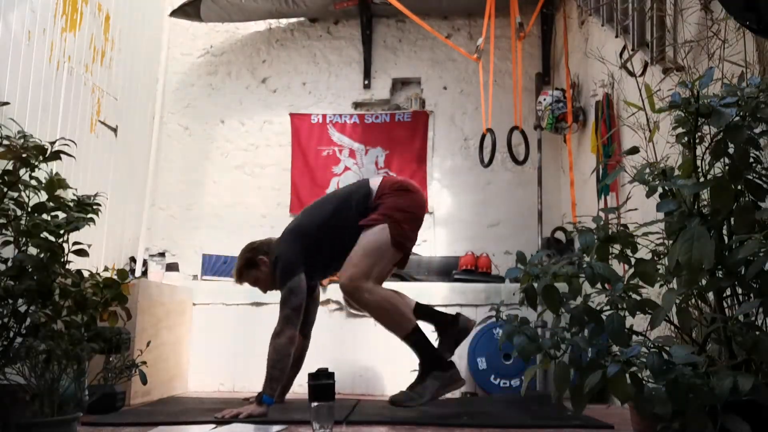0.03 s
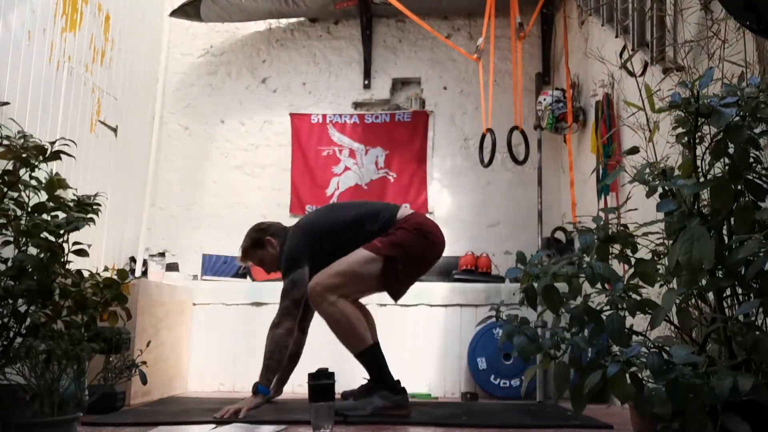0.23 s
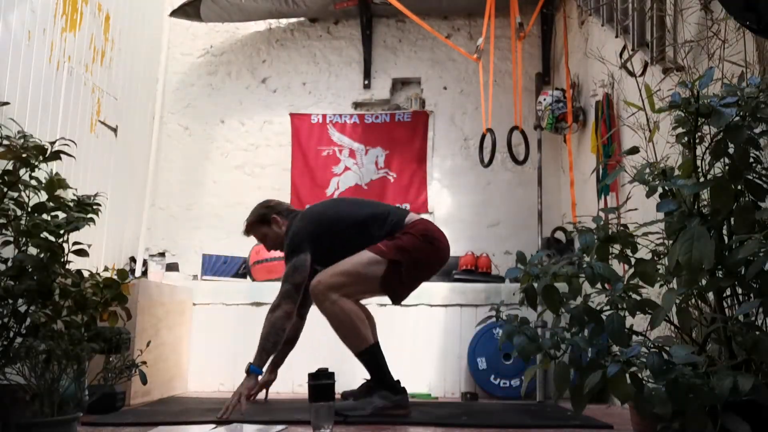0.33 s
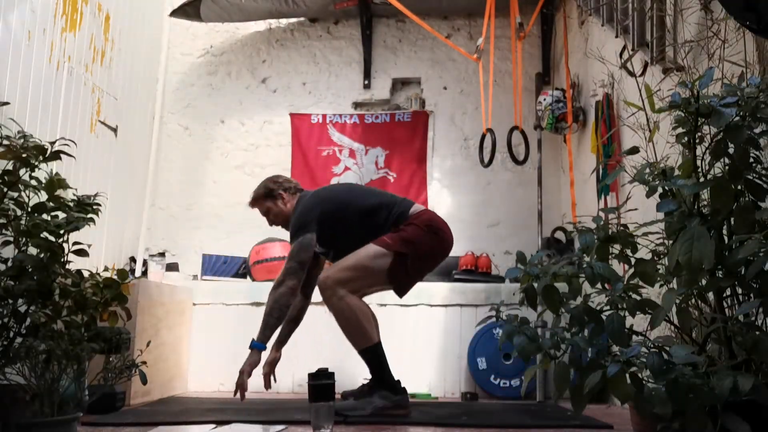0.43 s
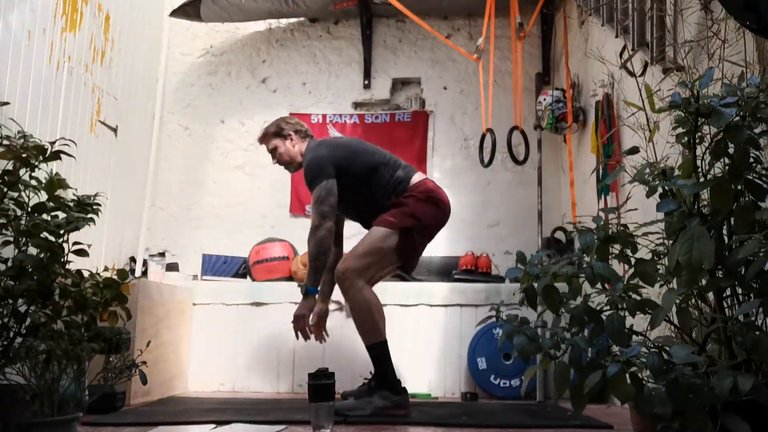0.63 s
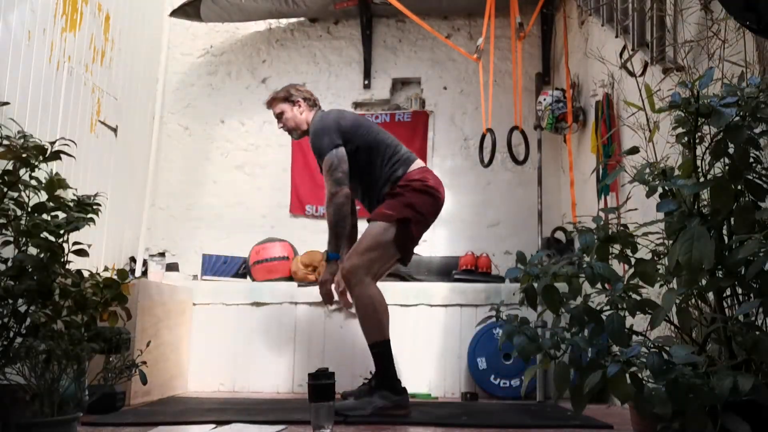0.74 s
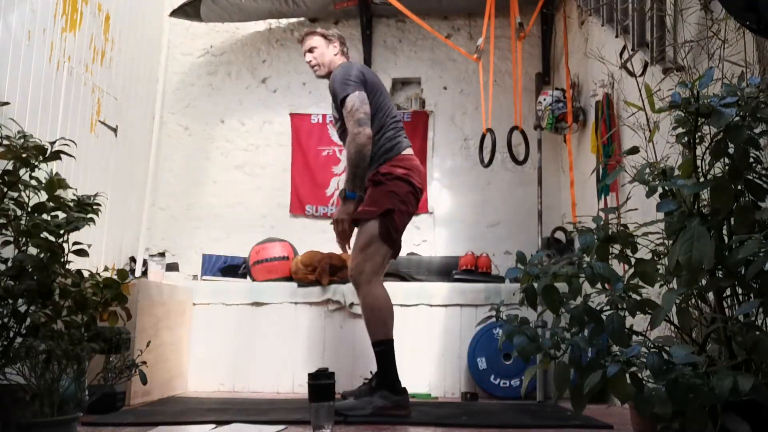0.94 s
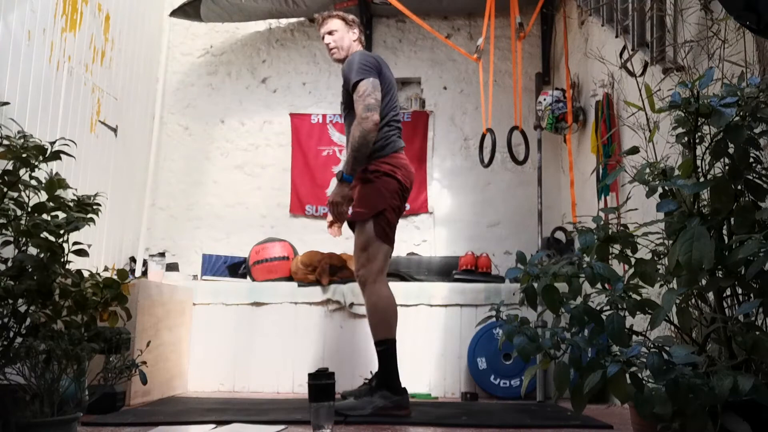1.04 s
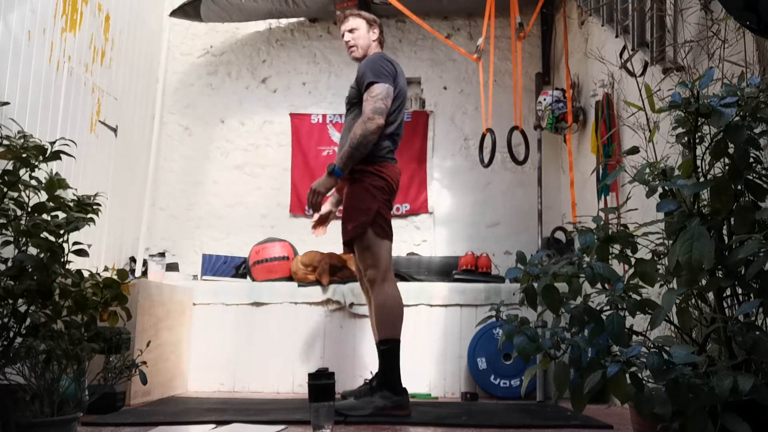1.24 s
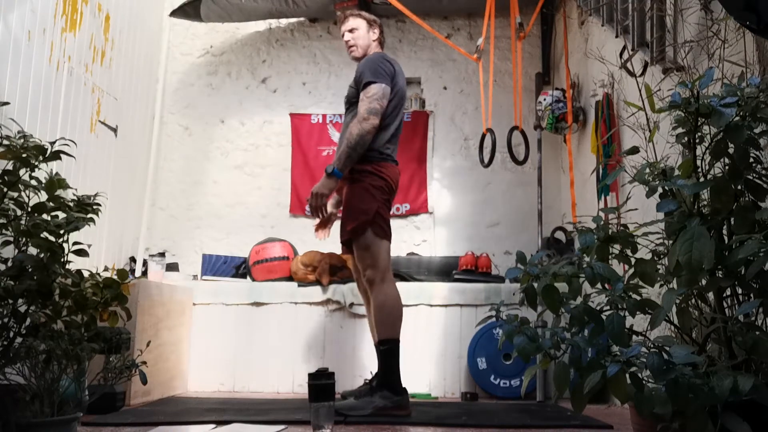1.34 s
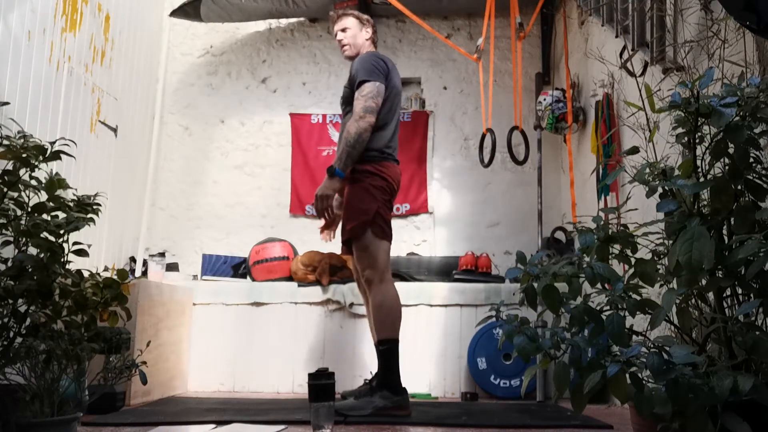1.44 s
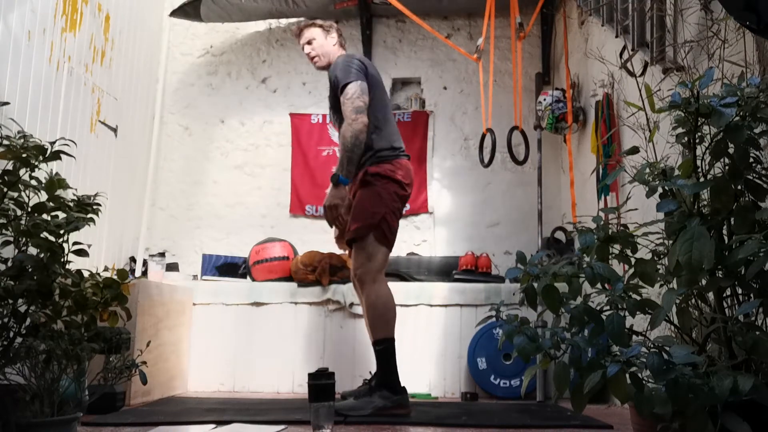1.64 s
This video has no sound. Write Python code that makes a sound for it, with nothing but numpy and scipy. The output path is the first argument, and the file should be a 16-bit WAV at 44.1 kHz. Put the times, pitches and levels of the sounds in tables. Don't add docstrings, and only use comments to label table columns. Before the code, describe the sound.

Shoes landing on a padded mat: a faint scuff and light patter in the first 0.1 s, then at about 0.22 s a rapid cluster of toe slaps and grainy rubber scuffing, heels dropping near 0.3 s with a deep hollow floor boom. Small taps end by 0.4 s, a barely audible brush follows near 0.5 s. The short hard-walled echo fades into quiet traffic rumble, thin hiss and a very faint steady hum.

```python
import sys
import numpy as np
from scipy import signal
from scipy.fft import rfft, irfft, next_fast_len
from scipy.io import wavfile
from scipy.ndimage import map_coordinates

SR = 44100
rng = np.random.default_rng(int(sys.argv[2]) if len(sys.argv) > 2 else 0)


def invert_db(x):
    u = np.asarray(x, float) / 20
    return 10 ** u


def dump(signal):
    limited = np.clip(np.atleast_2d(signal).T, -1, 1)
    pcm = np.round(limited * 32767).astype(np.int16)
    wavfile.write(sys.argv[1], SR, pcm)


N = 74970


def unit(x):
    return x / np.sqrt(np.mean(x ** 2) + 1e-20)


def along(points, hz):
    f, v = np.transpose(points)
    return np.interp(np.log(hz + 1), np.log(f + 1), v)


def wobble(knots_per_s):
    knots = rng.standard_normal(int(N * knots_per_s / SR) + 4)
    return map_coordinates(knots, [np.arange(N) * knots_per_s / SR])


def filtered(x, response):
    m = next_fast_len(N + SR // 2)
    return irfft(rfft(x, m) * response(np.fft.rfftfreq(m, 1 / SR)), m)[..., :N]


# (frequency [Hz], correlation [0-1])
NOISE_ALIKE = [(60, 1), (180, 0.95), (550, 0.34), (1650, 0.06), (4970, 0.18), (15000, 0.038)]


def rush(spectrum):
    def mid_side(hz):
        turn = np.arccos(np.clip(along(NOISE_ALIKE, hz), 0, 1)) / 2
        return invert_db(along(spectrum, hz)) * [np.cos(turn), np.sin(turn)]

    mid, side = filtered(rng.standard_normal((2, N)), mid_side)
    return unit(np.array([mid + side, mid - side]))


# (frequency [Hz], density [dB per Hz])
RUMBLE = [(22, -22), (45, -17), (62, -11), (80, -2), (98, -13.5), (280, -16), (600, -24.5), (1000, -32),
          (2400, -100)]
# (frequency [Hz], density [dB per Hz])
HISS = [(500, -40), (1100, -3), (2000, -6), (3000, -11), (5200, -15), (7600, -17), (10000, -14),
        (15600, -16)]
RUMBLE_DB, HISS_DB = -55, -72
HUM_HZ, HUM_DB = 740, -75


def background():
    t = np.arange(N) / SR
    hum = invert_db(HUM_DB + 1.5 * wobble(8)) * np.sin(2 * np.pi * HUM_HZ * t + 0.6 * wobble(6))
    rumble = invert_db(RUMBLE_DB + 0.4 * wobble(2.64) + 0.8 * wobble(11.74)) * rush(RUMBLE)
    hiss = invert_db(HISS_DB + 0.8 * wobble(2.5)) * rush(HISS)
    return rumble + hum + hiss


SCUFF_S = [
    -.02,
    .2235,
    .485,
]
# (hold [s], level [dB], fall over hold [dB], t60 after hold [s])
SCUFFS = [
    (0.12, -53, 4, .6),
    (0.155, -44, 12, .18),
    (.03, -70, 2, .25),
]
# (frequency [Hz], density [dB per Hz])
RUB = [(1700, -34), (2300, -27), (2800, -28), (3600, -34), (5400, -35), (8500, -30.5), (12000, -32),
       (15600, -41)]
SCUFF_RISE_S = 0.003


def scuffs():
    t = np.arange(N) / SR
    level = np.zeros(N)
    for start_s, (hold_s, db, fall_db, t60_s) in zip(SCUFF_S, SCUFFS):
        sag_db = fall_db * np.clip((t - start_s) / hold_s, 0, 1)
        decay_db = 60 * np.clip(t - start_s - hold_s, 0, 9) / t60_s
        rise = 1 - np.exp(-np.clip(t - start_s, 0, 9) / SCUFF_RISE_S)
        level += invert_db(db - sag_db - decay_db) * rise
    grain = invert_db(0.39 * wobble(52.8))
    return level * grain * rush(RUB)


# (slap level [dB], brightness [Hz], weight into floor [dB])
CONTACTS = [(-37.5, 750, -55.5), (-37, 1200, -55.5), (-40, 380, -52.5), (-44, 2000, -69),
            (-44.5, 1200, -62), (-46, 2100, -67.5), (-49, 1400, -69.5), (-20, 2200, -59.5),
            (-16.5, 3200, -48), (-23.5, 3600, -74), (-19, 2100, -34.5), (-21.5, 3100, -60),
            (-25.5, 4200, -36), (-24.5, 1800, -61), (-22, 2200, -32.5), (-23.5, 1300, -36),
            (-25.5, 5400, -32), (-28.5, 1700, -47), (-24, 2000, -33), (-23.5, 1530, -42),
            (-27.5, 1690, -18), (-35, 900, -33.5), (-38.5, 2000, -36), (-39.5, 2300, -50)]
# (frequency [Hz], width [Hz], level [dB])
MAT = [(267, 89, -4), (530, 86, 2), (625, 37, 0.5), (701.5, 87, 3.5), (894, 90, 3.5), (1087, 120, -5),
       (1392, 67, -11.5), (847, 1400, -11.5), (2222, 350, -9.5), (2540, 200, -12)]
SLAP_T60_S, GRIT = 0.014, 0.65
CRISP_HZ = 2900


def slaps():
    t = np.arange(4096) / SR
    f = np.fft.rfftfreq(len(t), 1 / SR)
    grit = GRIT * invert_db(-60 * t / SLAP_T60_S) * rng.standard_normal((len(CONTACTS), len(t)))
    push = 6 * (t == 0)
    modes = sum(invert_db(db) * 1j * f * w / (c * c - f * f + 1j * f * w) for c, w, db in MAT)
    foam = 1 / (1 + 1j * f / CRISP_HZ - (f / CRISP_HZ) ** 2) ** 2
    db, bright_hz, _ = np.transpose(CONTACTS)[..., None]
    softness = 1 / (1 + 1j * f / bright_hz) ** 2
    return 8 * invert_db(db) * irfft(rfft(grit + push) * modes * foam * softness, len(t))


CONTACT_S = [.001, .0205, .037, .043, .055, .068, .084, .223, .2259, .2312, .2339, .2372, .2408, .2485,
             .2538, .257, .268, .278, .2825, .2895, .2945, .325, .347, .3685]
# (frequency [Hz], level [dB], t60 [s])
BOARDS = [(46, 0, .55), (74, -1, .3), (113, -8, .45), (148, -16, .4), (194, -11, .22), (290, -5, .2)]
BOARD_RISE_S = 0.003284


def floor_boom():
    out = np.zeros(N + SR)
    t = np.arange(SR // 2) / SR
    ring = sum(invert_db(db - 60 * t / t60_s) * np.sin(2 * np.pi * hz * t) for hz, db, t60_s in BOARDS)
    ring = ring * (1 - np.exp(-t / BOARD_RISE_S))
    for start_s, (_, _, weight_db) in zip(CONTACT_S, CONTACTS):
        out[round(start_s * SR):][:len(t)] += invert_db(weight_db) * ring
    return out[:N]


# (frequency [Hz], t60 [s])
YARD = [(150, 0.4), (700, 0.33), (1300, .28), (2500, 0.26), (8000, 0.3)]
# (frequency [Hz], share [0-1])
YARD_ALIKE = [(300, .6), (600, .2), (2500, .2)]
YARD_GAP_S = 0.0045


def yard():
    hz, t, z = signal.stft(rng.standard_normal((3, SR // 2)), SR, nperseg=256)
    share = np.clip(along(YARD_ALIKE, hz), 0, 1)[:, None]
    pair = np.sqrt(share) * z[2] + np.sqrt(1 - share) * z[:2]
    decay = invert_db(-60 * t / along(YARD, hz)[:, None])
    tail = signal.istft(pair * decay, SR, nperseg=256)[1]
    tail = tail / np.linalg.norm(tail, axis=1)[:, None]
    return np.pad(tail, ((0, 0), (round(YARD_GAP_S * SR), 0)))


YARD_DB = 0
LEFT_LAG_S = 0.00022


def footfalls():
    direct, wet = np.zeros(N + SR), np.zeros((2, N + SR))
    for start_s, slap in zip(CONTACT_S, slaps()):
        start = round(start_s * SR)
        answer = signal.fftconvolve(slap[None], yard(), axes=1)
        direct[start:][:len(slap)] += slap
        wet[:, start:][:, :answer.shape[1]] += answer
    lag = lambda hz: np.exp(-2j * np.pi * hz * np.array([[LEFT_LAG_S], [0]]))
    return filtered(direct[:N], lag) + invert_db(YARD_DB) * wet[:, :N]


def scene():
    return background() + scuffs() + footfalls() + floor_boom()


def low_pass(x):
    return signal.sosfilt(signal.butter(12, 15800, fs=SR, output="sos"), x)


# (frequency [Hz], gain [dB])
LEFT = [(400, -4.5), (700, -7), (1300, -4), (2400, -5.5), (5000, -1.5), (7400, 2), (7800, -17), (9000, -20),
        (12000, -17)]
# (frequency [Hz], gain [dB])
RIGHT = [(7500, -3), (8000, 3), (8800, 5), (9800, 2), (10800, 7), (11600, 1)]
EVEN_HZ = 140
LOW_CUT_HZ, TOP_HZ = 36.5, 15790


def record(dry):
    def microphones(hz):
        left_db = along([(EVEN_HZ, 0)] + LEFT, hz)
        right_db = along([(6000, 0.014)] + RIGHT, hz)
        low_cut = (1j * hz / (LOW_CUT_HZ + 1j * hz)) ** 2
        return (hz < TOP_HZ) * invert_db([left_db, right_db]) * low_cut

    return low_pass(filtered(dry, microphones))


dry = scene()
out = record(dry)
dump(out)
```